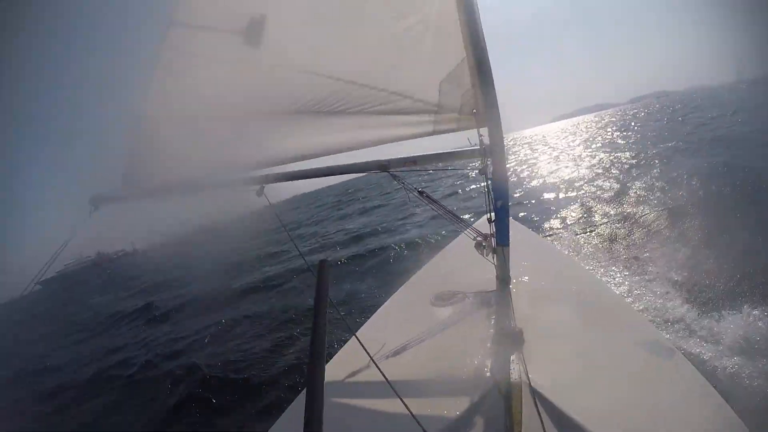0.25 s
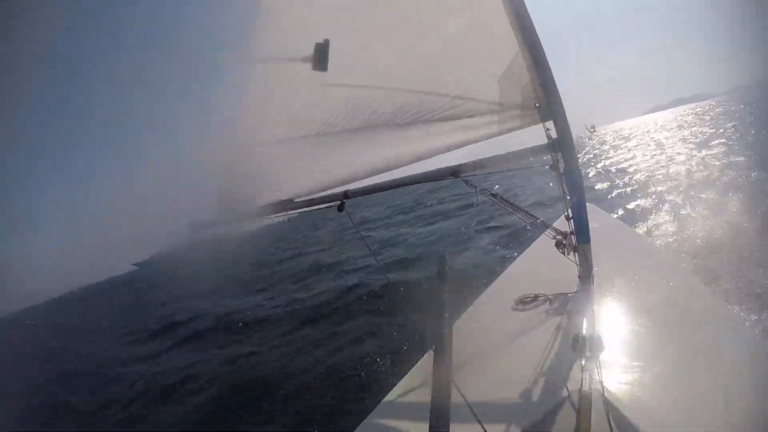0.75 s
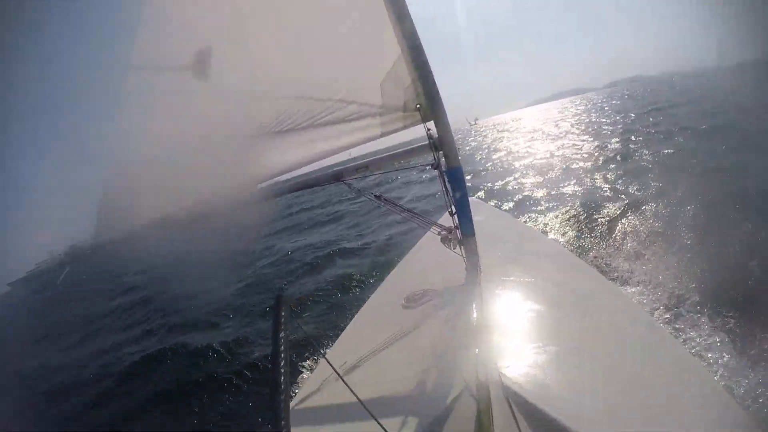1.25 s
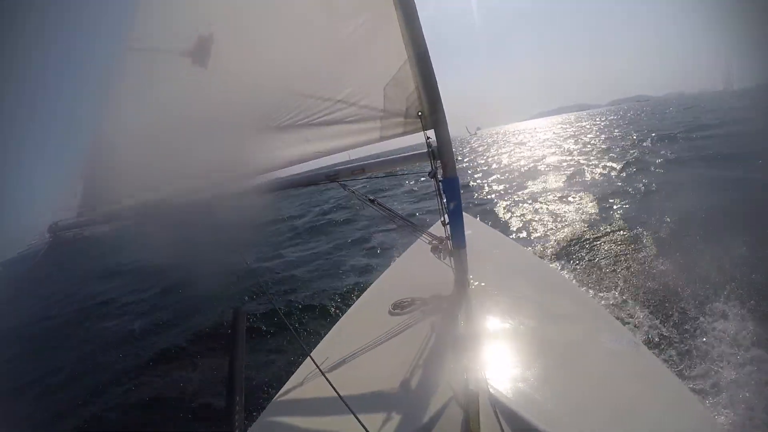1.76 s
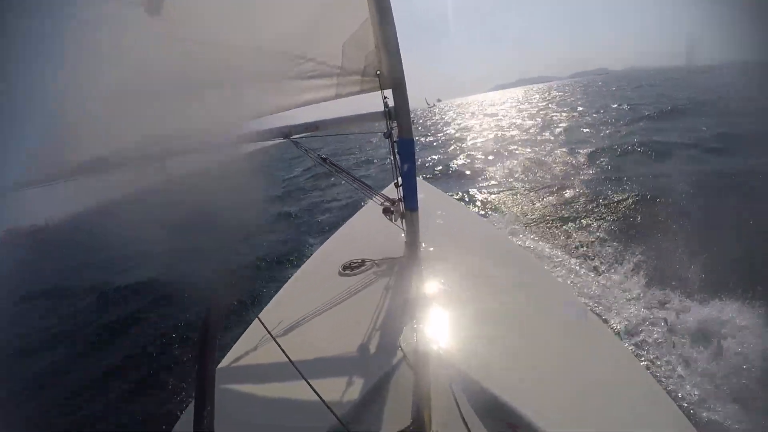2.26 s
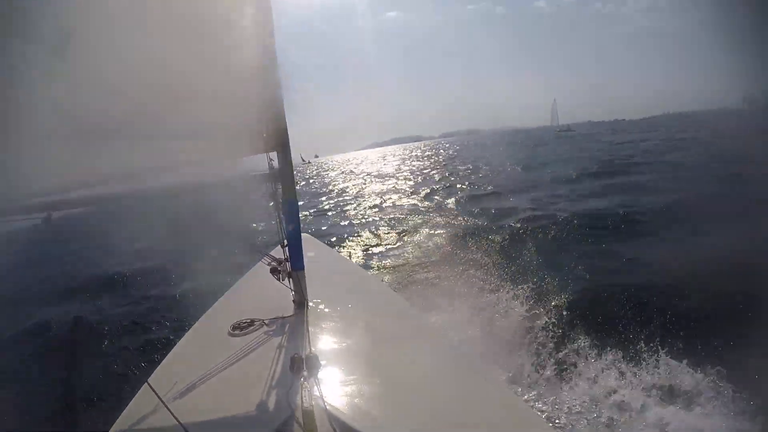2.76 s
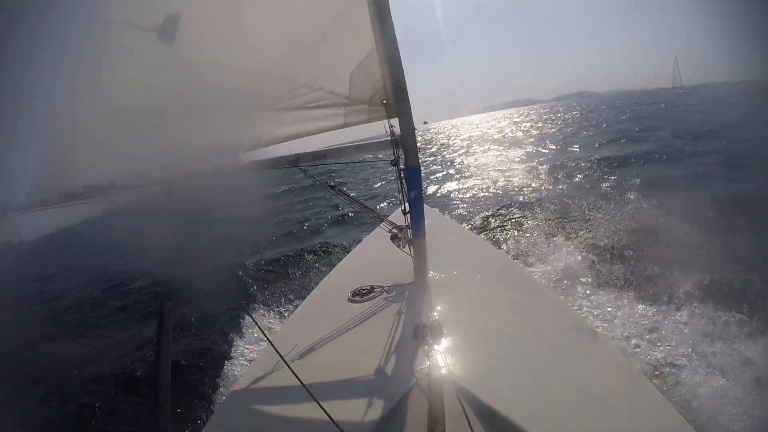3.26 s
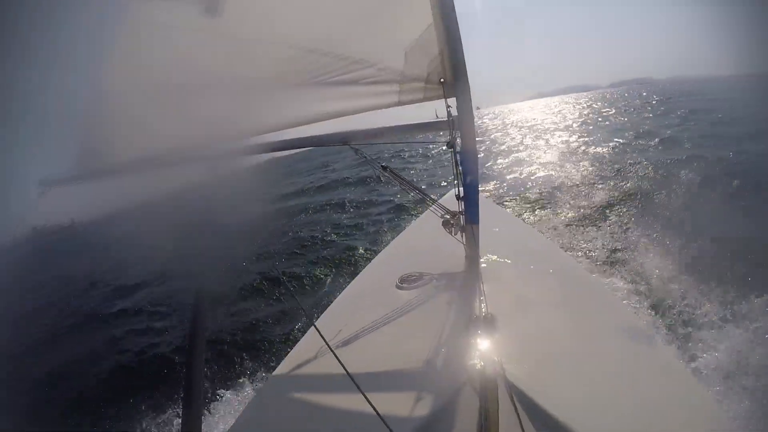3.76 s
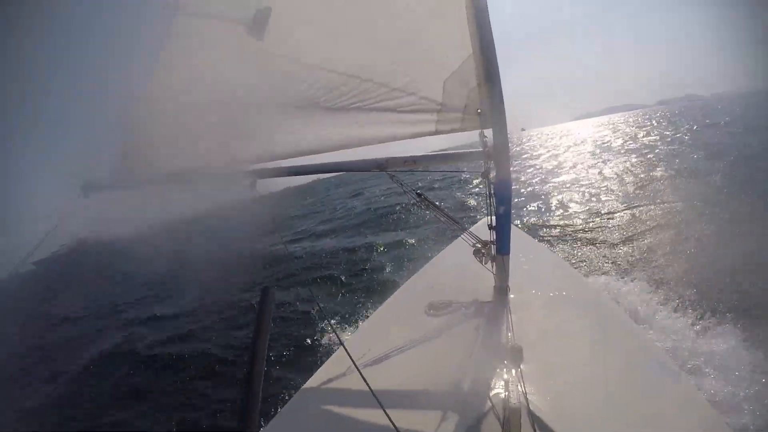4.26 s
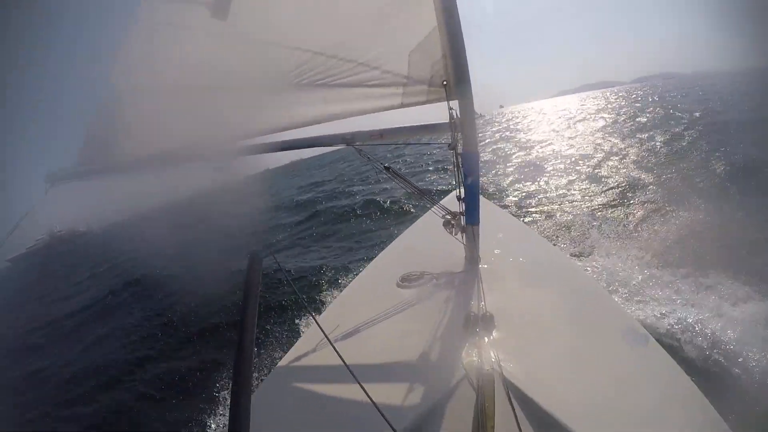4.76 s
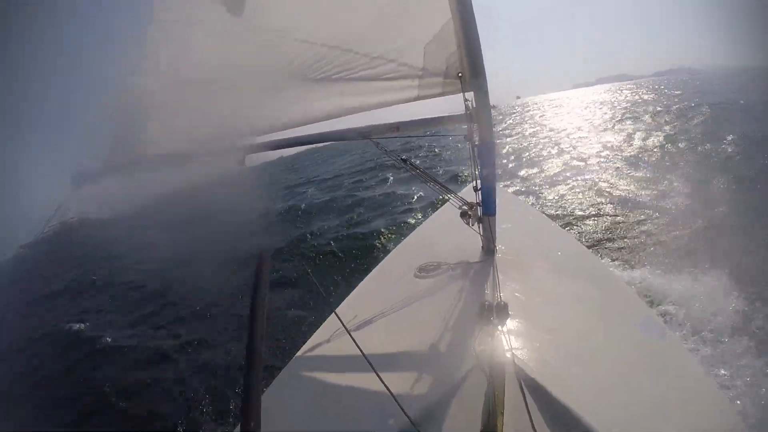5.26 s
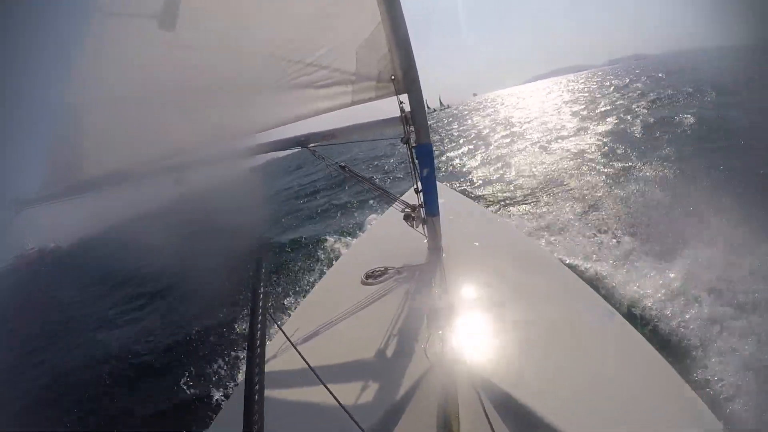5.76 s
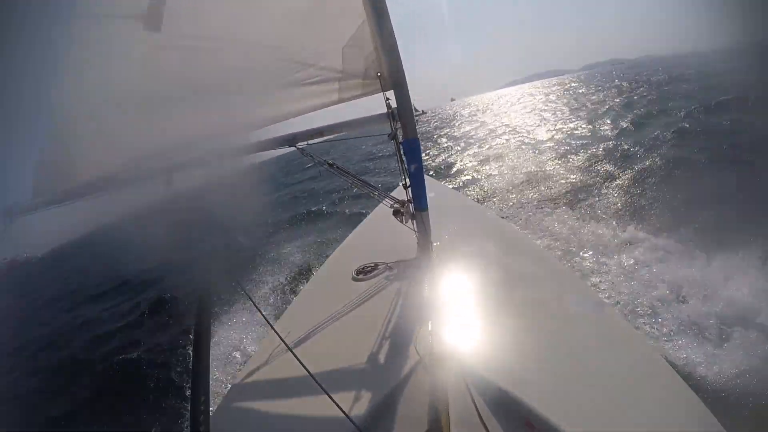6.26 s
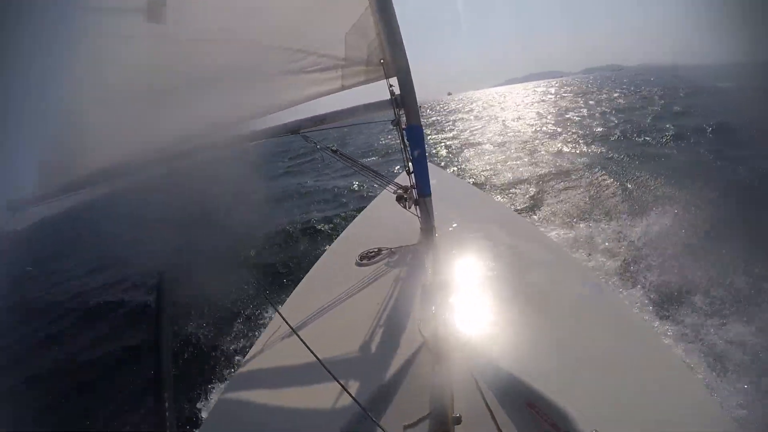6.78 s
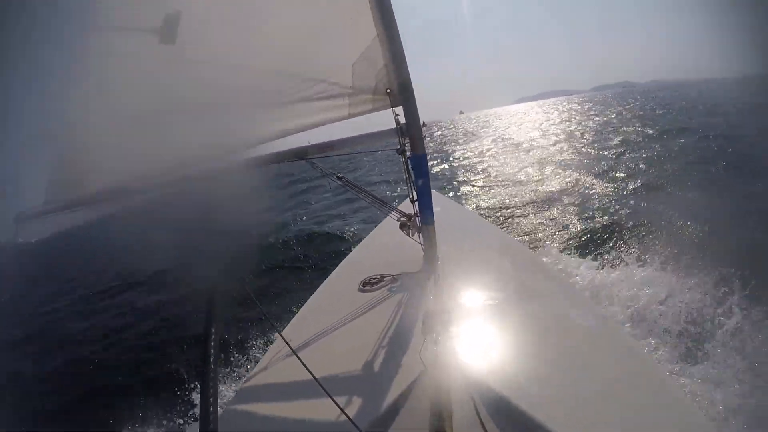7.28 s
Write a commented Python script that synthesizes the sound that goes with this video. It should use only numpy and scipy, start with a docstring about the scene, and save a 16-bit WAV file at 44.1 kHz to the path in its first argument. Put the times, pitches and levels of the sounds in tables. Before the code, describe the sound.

Outdoors on a small sailboat moving fast in strong wind, heard from a cased microphone on deck that gives the water a resonant, slightly boxy colour. From 0 to 0.3 seconds a ratchet block whirrs in two joined pulls, rapid ringing clicks speeding up and then slowing, with a low slap at about 0.2. The bow wave rushes throughout as a grainy, bubbling hiss; it dips around 1 second, rises again, and is fuller and more sprayed from about 3 seconds onward, surging with each crest. Wind rumbles very low in uneven throbs, with strong thumps from 2 to 3 and around 4.2 seconds, another at 5.4, calmer late. Soft gurgling slaps touch the hull at intervals, notably 3.4, 5.5 and 6.4. Tiny drops tick close by around 2, 4.2, 5.6 and 6.4. The rush carries on to the end at 7.5.

```python
"""On the deck of a small sailing boat planing in a strong wind, heard by the microphone of a cased camera.
The bow wave rushes along the hull: noise, random pops and ringing bubbles, coloured by the case's resonances.
Wind rumbles on the case as low noise that throbs with the gusts, under a flutter of small eddies.
A ratchet block whirrs in two pulls of the sheet, each tooth a ringing click; waves slap the hull as soft
bursts of filtered noise, and a few drops tick close by as very short ones."""
import sys
import numpy as np
from scipy import signal
from scipy.fft import rfft, irfft
from scipy.io import wavfile
from scipy.ndimage import uniform_filter1d, map_coordinates

SR = 44100
rng = np.random.default_rng(int(sys.argv[2]) if len(sys.argv) > 2 else 0)


def int16_out(signal):
    """Quantize to a 16-bit WAV file."""
    q = np.round(np.clip(np.atleast_2d(signal).T, -1, 1) * 32767)
    wavfile.write(sys.argv[1], SR, q.astype(np.int16))


N = 332073  # samples
TIME = np.arange(N) / SR  # s
FREQ = np.maximum(np.arange(N // 2 + 1) * SR / N, 1)  # Hz, kept above 0 for logs and ratios

# The boat's speed through the water, told as the relative loudness of the bow wave.
# Each row: time in seconds, flow in dB.
FLOW = [(0.0, -1.2), (0.4, -3.5), (1.02, -5.5), (1.35, -3), (2.15, -3), (2.9, -0.87), (3.7, 0.66),
        (4.35, -0.5), (5.1, 0.1), (5.75, 0.9), (6.35, 0.25), (6.75, 0.2), (7.53, 0)]


def undb(db):
    """Decibels to gain."""
    return 10 ** (np.asarray(db) / 20)


def unit(x):
    """Scale to rms 1."""
    return x / np.sqrt(np.mean(x ** 2))


def curve(table):
    """Rows of (seconds, value) as a value per sample."""
    s, value = np.transpose(table)
    return np.interp(TIME, s, value)


def spectrum(points):
    """Gain per frequency from (Hz, dB) points, joined along a logarithmic frequency axis."""
    hz, db = np.transpose(points)
    return undb(np.interp(np.log(FREQ), np.log(hz), db))


def shape(x, gain):
    """Filter by a gain per frequency."""
    return irfft(rfft(x) * gain, N)


def resonance(hz, width):
    """Response of one damped mode, gain 1 at its centre."""
    return 1 / (1 + 1j * (FREQ ** 2 - hz ** 2) / (FREQ * width))


def walk(rate):
    """Smooth chance with spread 1 that changes about rate times a second."""
    return unit(shape(rng.standard_normal(N), 1 / (1 + (FREQ / rate) ** 2)))


def swell(s, rise_s, fall_s):
    """A smooth rise to 1 at time s and a smooth fall; each time constant reaches 1/e."""
    age = TIME - s
    steps = age / np.where(age < 0, rise_s, fall_s)
    return np.exp(-np.minimum(steps ** 2, 50))


def case_colour():
    """The case lets sound through best around its resonances; lifts add where they overlap."""
    # Each row: centre in Hz, width in Hz between the points of half the dB lift, lift in dB.
    case_modes = [(963, 220, 3.0), (1526, 278, 11.5), (1843, 287, 13.5), (2277, 470, 6.5), (2915, 337, 8),
                  (3323, 535, 16.5), (3842, 496, 15), (4294, 320, 8.5), (4982, 570, 11.5), (5490, 465, 9),
                  (6033, 440, 10.5), (7960, 550, 5.5), (8990, 620, 7.5), (11350, 560, 6)]
    return undb(sum(db * np.exp2(-(2 * (FREQ - hz) / width) ** 2) for hz, width, db in case_modes))


def pops(rate, spread_db):
    """Random impulses, rate per second: many small, a few large."""
    chance = rng.random(N)
    size = np.minimum(rng.exponential(size=N), 5)
    sign = rng.choice([-1, 1], N)
    return unit((chance < rate / SR) * undb(spread_db * size) * sign)


def bubbles(count, low_hz, high_hz, cycles, glide, spread_db):
    """Air pockets ring for some cycles and rise in pitch as they surface."""
    out = np.zeros(N)
    for when, pitch, size in rng.random((count, 3)):
        hz = low_hz * (high_hz / low_hz) ** pitch
        start = int(when * N)
        samples = min(int(2 * cycles * SR / hz), N - start)
        age = np.arange(samples) * hz / SR / cycles  # 1 after the given cycles at the starting pitch
        ring = np.exp(-np.pi * age) * np.sin(2 * np.pi * cycles * age * (1 + glide * age / 2))
        out[start:start + samples] += undb(spread_db * size) * ring
    return unit(out)


def water_levels():
    """dB of rushing foam, churning water and fine spray: all follow the speed; crests throw up foam and spray."""
    # The bow cuts through a crest. Each row: peak in seconds, lift of the foam in dB, lift of the spray in dB.
    crests = [(0.58, 2.5, 2.9), (0.83, 1.5, 0.5), (1.47, 2.2, 2.5), (1.84, 3, 2), (2.33, 2.7, 0),
              (2.53, 1.6, 0.3), (2.77, 1, 0), (3.21, 0.5, 3), (3.5, 1, -0.5), (3.8, 2, 2), (3.96, 2.7, 2.0),
              (4.19, 0.4, 3.5), (4.47, 3.5, 2.1), (4.69, 0.6, 3.5), (4.83, 1.5, 1.6), (5.58, 0.6, 1.6),
              (5.77, 1.3, 0), (5.98, 1, 1.5), (6.26, 2.5, 0), (6.44, 1, 0.8), (7.2, 1, 2.5), (7.44, 0, 4)]
    churn_per_flow, spray_per_flow = 0.62, 1.64  # dB for each dB of flow: spray grows fastest with speed
    flow = curve(FLOW)
    rush, churn, spray = flow, churn_per_flow * flow, spray_per_flow * flow
    for s, foam_db, spray_db in crests:
        crest = swell(s, rise_s=0.058, fall_s=0.075)
        rush = rush + foam_db * crest
        spray = spray + spray_db * crest
    # each level is set against its own mean power
    rush, churn, spray = (db - 10 * np.log10(np.mean(10 ** (db / 10))) for db in (rush, churn, spray))
    return rush, churn - 0.63, spray


def bow_wave(water_db=-43.5, flicker_db=0.97, surge_db=0.04, patter_db=0.3, gurgle_db=0.83):
    """Foam bursts, bubbles ring and spray patters; each part swells as the hull meets the waves."""
    # Breaking water before the case colours it. Each row: frequency in Hz, relative density in dB per Hz.
    water = [(30, -2), (100, 3), (250, -.6), (350, 0), (700, -3), (1200, -6), (2600, -6.5), (4600, -12.5),
             (6700, -14), (10000, -17.5), (12500, -19), (15000, -23)]
    rush, churn, spray = water_levels()
    foam = unit(rng.standard_normal(N) + pops(rate=5000, spread_db=2.5))
    foam = foam + undb(-20.5) * bubbles(
        count=2200, low_hz=400, high_hz=4610, cycles=8.9, glide=0.12, spread_db=11)
    sound = rfft(unit(shape(foam, spectrum(water) * case_colour())))
    surge = surge_db * walk(22)
    patter = patter_db * walk(45)
    octave = np.log2(np.clip(FREQ, 250, 16000) / 250)
    out = 0
    # overlapping bands half an octave apart, each flickering by itself
    for step in np.arange(13) / 2:
        hz = 250 * 2 ** step
        band = irfft(sound * np.maximum(1 - 2 * np.abs(octave - step), 0), N)
        # big pockets of air carry the lows and gurgle unevenly, the finest droplets carry the highs
        deep = np.interp(hz, [900, 1500], [1, 0])
        fine = np.interp(hz, [3200, 7800], [0, 1])
        db = deep * churn + fine * (spray + patter) + (1 - deep - fine) * rush
        flicker = (flicker_db + deep * gurgle_db) * walk(29)
        out = out + band * undb(db + surge + flicker)
    return out * undb(water_db)


def deck_echo(x, echo_db=-17, lag_s=0.001078, sway_s=0.000255):
    """The deck mirrors the hiss; the path changes as the boat rolls, so the colour drifts."""
    lag = SR * (lag_s + sway_s * walk(0.9))
    echo = map_coordinates(x, [np.arange(N) - lag], order=3, mode="nearest")
    return x + undb(echo_db) * echo


def wind(gust_level_db=-0.4, blow_level_db=-0.7, lull_db=1.4, eddy_db=-56.5, eddy_waver_db=0.4, deep_hz=72):
    """Large vortices shake the case in slow throbs, a few of them hard; small eddies flutter above them."""
    # Strength of the wind on the case.
    # Each row: time in seconds, rumble in dB before the overall gust level is added.
    gusts = [(0, -36.5), (0.7, -41), (2, -37.5), (3.3, -39.5), (4.1, -35.5), (4.85, -44.5), (5.1, -43),
             (5.28, -37), (6.1, -39.5), (7.53, -40.5)]
    # Single large vortices strike the case. Each row: peak in seconds,
    # length in seconds between the 1/e points, level in dB before the overall blow level is added.
    blows = [(0.236, 0.11, -31.5), (0.938, 0.038, -31.5), (2.045, 0.039, -27.5), (2.323, 0.055, -29),
             (2.635, 0.087, -26), (2.886, 0.1, -25.5), (3.04, 0.087, -30), (3.174, 0.11, -33),
             (3.367, 0.16, -29.5), (3.46, 0.06, -33), (3.911, 0.048, -28), (4.074, 0.17, -28.5),
             (4.2, 0.043, -24.5), (4.427, 0.035, -28), (4.55, 0.098, -31.5), (4.66, 0.098, -31.5),
             (5.375, 0.037, -26), (5.496, 0.17, -33), (6.756, 0.037, -36)]
    # Wind pressure of the large vortices, ahead of the low-pass.
    # Each row: frequency in Hz, relative density in dB per Hz.
    buffet = [(5, -10.5), (13, -2.5), (25, 0), (35, 5), (50, -8), (65, -13.5), (100, -32), (500, -100)]
    # Flutter of the small eddies. Each row: frequency in Hz, relative density in dB per Hz.
    flutter_colour = [(30, -8), (65, 4.5), (130, -3), (200, -9.5), (400, -24), (3000, -72)]
    eddy_per_flow, eddy_per_gust = 0.35, 0.3  # dB for each dB: it grows with the headwind and in the gusts
    gust, flow = curve(gusts), curve(FLOW)
    vortices = unit(shape(rng.standard_normal(N), spectrum(buffet)))
    # the throbs come and go by chance, except where a large vortex takes over
    power = np.abs(signal.hilbert(vortices)) ** 2
    strength = np.sqrt(uniform_filter1d(uniform_filter1d(power, size=1500), size=1500))
    push = unit(strength) * undb(gust + gust_level_db + lull_db * walk(10))
    for s, length, db in blows:
        push = push + (undb(db + blow_level_db) - push) * swell(s, length / 2, length / 2)
    # air has inertia, so even a sudden gust stays deep
    throb = shape(unit(vortices / strength) * push, 1 / (1 + (FREQ / deep_hz) ** 6))
    flutter = unit(shape(rng.standard_normal(N), spectrum(flutter_colour)))
    flutter_db = eddy_db + eddy_per_flow * flow + eddy_per_gust * (gust - gust.mean())
    return throb + flutter * undb(flutter_db + eddy_waver_db * walk(3))


def ratchet(scrape_s=0.0017, scrape=0.28, tighten=0.45, scatter=0.008, soft_hz=14500):
    """The pawl drops off each tooth, chatters for an instant and rings, a little higher as the sheet loads the block."""
    # Pulls of the sheet over the block. Each row: start in seconds, length in seconds,
    # teeth a second at first, teeth a second at last, click peak in dB at the mean rate before softening.
    pulls = [(.013, .18, 47, 166, -34), (0.206, 0.087, 152, 55, -37)]
    # Ringing of the pawl. Each row: nominal pitch in Hz, width in Hz (sets the decay), relative level in dB.
    pawl = [(1800, 200, 2), (3380, 360, 11.5), (5500, 230, 3), (7300, 660, -1), (7750, 320, 4),
            (8800, 520, 0), (10450, 330, -3), (12700, 460, 1), (13500, 600, 1)]
    click_db_per_octave = 1  # faster teeth strike harder
    teeth = []  # (sample, dB)
    for s, length, first, last, db in pulls:
        rate = np.linspace(first, last, int(length * SR))
        force = db + click_db_per_octave * np.log2(rate / rate.mean())
        falls = np.flatnonzero(np.diff(np.floor(np.cumsum(rate) / SR), prepend=-1))
        teeth += [(int(s * SR) + i, force[i]) for i in falls]
    middle = np.mean(teeth, axis=0)[0]
    hz, width, mode_db = np.transpose(pawl)[:, :, None]
    out, age = np.zeros(N), TIME[:SR // 100]
    for i, db in teeth:
        contact = (age == 0) + scrape * rng.standard_normal(len(age)) * np.exp(-age / scrape_s)
        # tighten is the fraction of pitch gained per second
        pitch = hz * (1 + tighten * (i - middle) / SR + scatter * rng.standard_normal(hz.shape))
        strength = rng.choice([-1, 1], hz.shape) * undb(mode_db)
        ring = strength * np.exp(-np.pi * width * age) * np.sin(2 * np.pi * pitch * age)
        click = np.convolve(contact, ring.sum(0))
        out[i:i + len(click)] += undb(db) * click / np.abs(click).max()
    return shape(out, 1 / (1 + (FREQ / soft_hz) ** 20))


def slaps():
    """A wave meets the hull and churns a pocket of air: noise through a resonance, a thud or a gurgle."""
    # Each row: peak in seconds, length in seconds from the peak to 17 dB below it,
    # level at the peak in dB, pitch in Hz, width in Hz.
    slap_table = [(0.183, 0.071, -47.5, 130, 80), (1.08, 0.15, -60.5, 126, 100),
                  (1.75, .18, -59.5, 620, 550), (2.38, 0.19, -57.5, 600, 600), (2.7, 0.095, -59, 600, 600),
                  (3.36, .1, -54.5, 705, 300), (3.963, 0.063, -56, 650, 600), (4.02, .26, -56, 107, 90),
                  (4.474, 0.34, -57, 600, 600), (4.69, 0.22, -58, 164, 90), (5.506, .08, -54, 109, 70),
                  (6.352, 0.27, -54.5, 765, 400), (7.23, 0.12, -56.5, 400, 700)]
    out = 0
    for s, length, db, hz, width in slap_table:
        pocket = unit(shape(rng.standard_normal(N), resonance(hz, width) ** 2))
        out = out + undb(db) * pocket * np.exp(-((TIME - s) / length) ** 2 * 2)
    return out


def drops(splat_s=0.0013, width_hz=4500):
    """Single drops splat on the deck by the camera: brief decaying noise, coloured by the case."""
    # Each row: start in seconds, peak in dB, centre in Hz before the case colours it.
    drop_table = [(1.03, -43, 5500), (1.148, -44, 5000), (1.787, -38, 6000), (1.868, -41, 8500),
                  (2.040, -35, 5200), (2.160, -34, 5200), (2.279, -40, 6000), (4.157, -34, 6000),
                  (5.573, -31, 5500), (5.593, -38, 6000), (6.371, -32, 5500)]
    out, age, colour = np.zeros(N), TIME[:SR // 100], case_colour()
    for s, db, hz in drop_table:
        splat, start = np.zeros(N), int(s * SR)
        splat[start:start + len(age)] = rng.standard_normal(len(age)) * np.exp(-age / splat_s)
        tick = shape(splat, resonance(hz, width_hz) ** 2 * colour)
        out += undb(db) * tick / np.abs(tick).max()
    return out


def scene():
    """Water, wind and deck gear at one microphone."""
    water = deck_echo(bow_wave())
    return (water + wind() + ratchet() + slaps() + drops())[None]


def record(dry, top_hz=15350):
    """The camera cuts the top with a steep low-pass."""
    low_pass = signal.ellip(12, 0.1, 80, top_hz, fs=SR, output="sos")  # 0.1 dB ripple, 80 dB down
    return signal.sosfilt(low_pass, dry)


dry = scene()
out = record(dry)
int16_out(out)
```